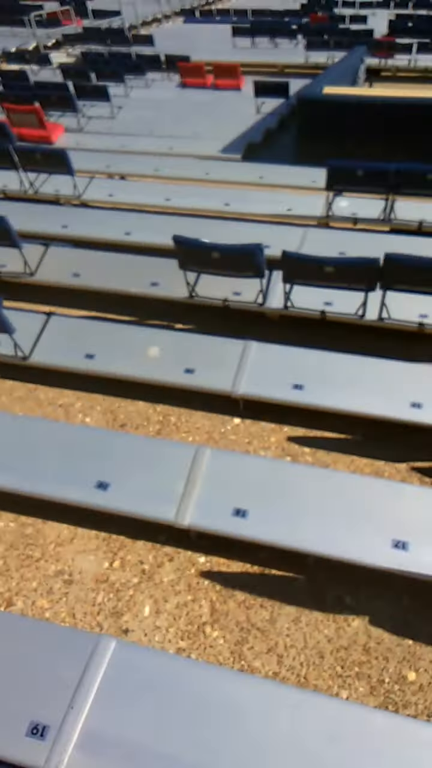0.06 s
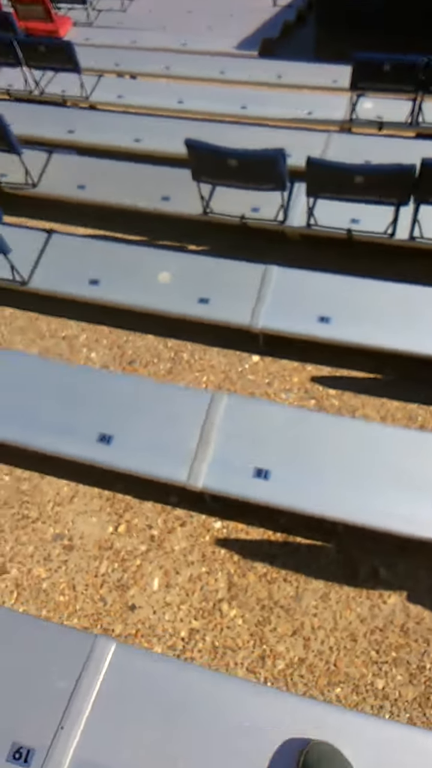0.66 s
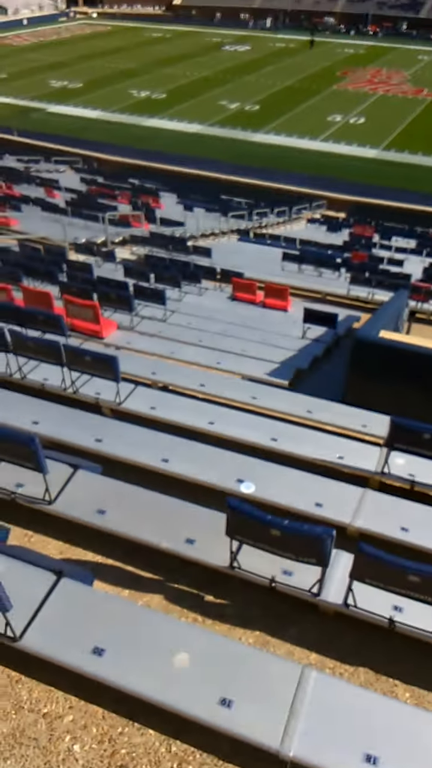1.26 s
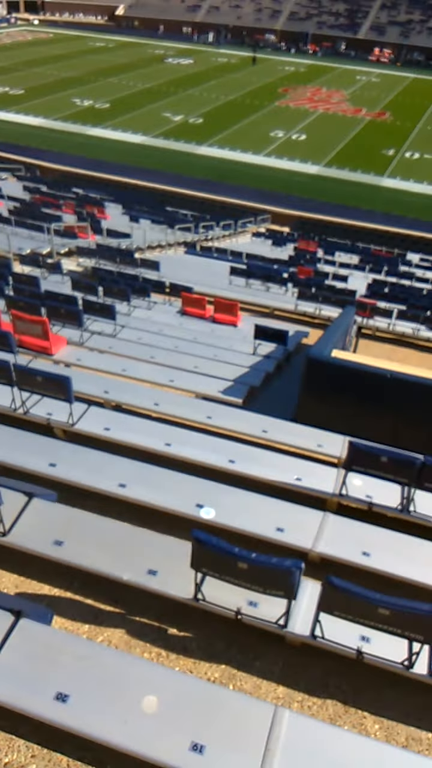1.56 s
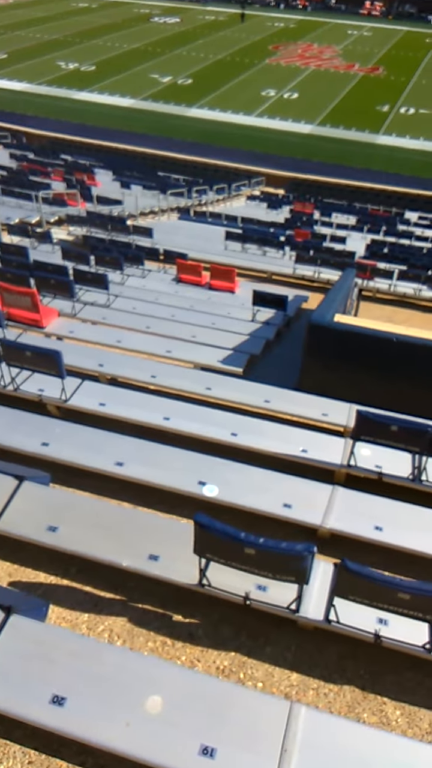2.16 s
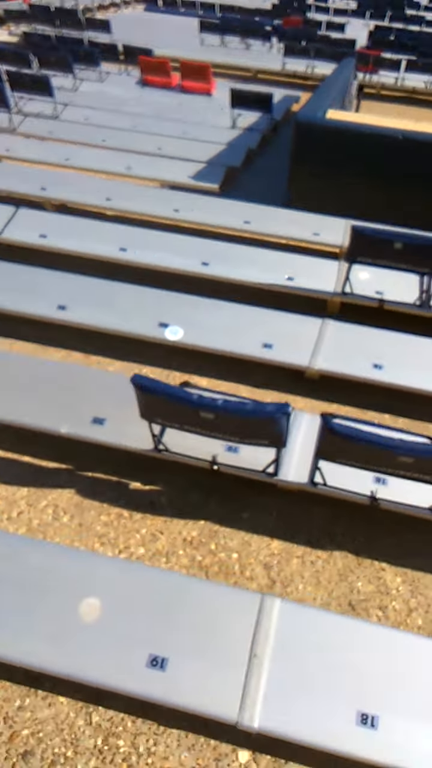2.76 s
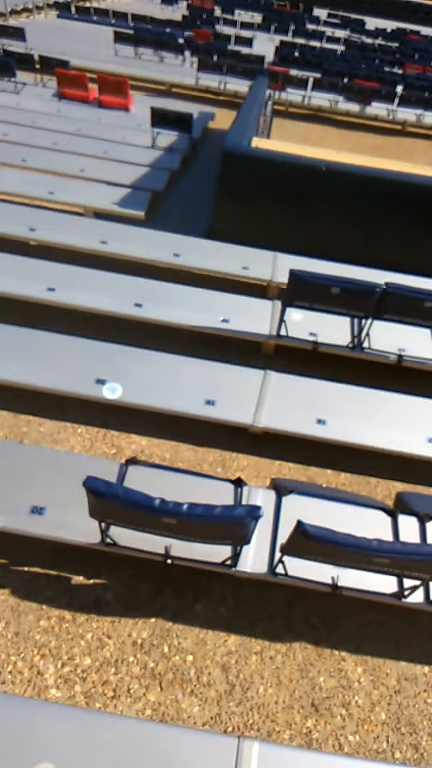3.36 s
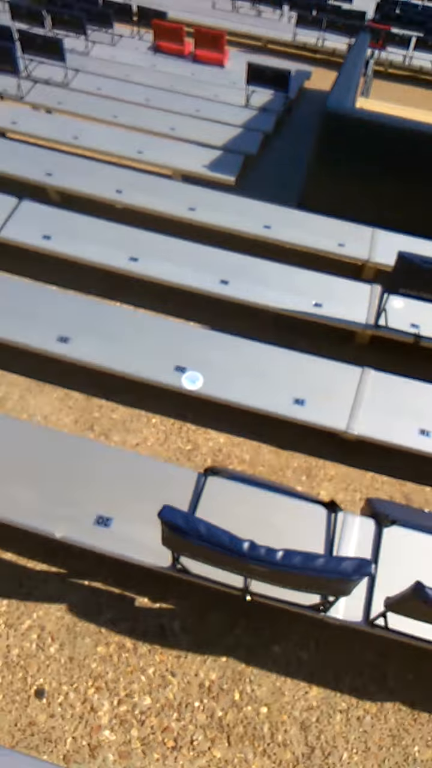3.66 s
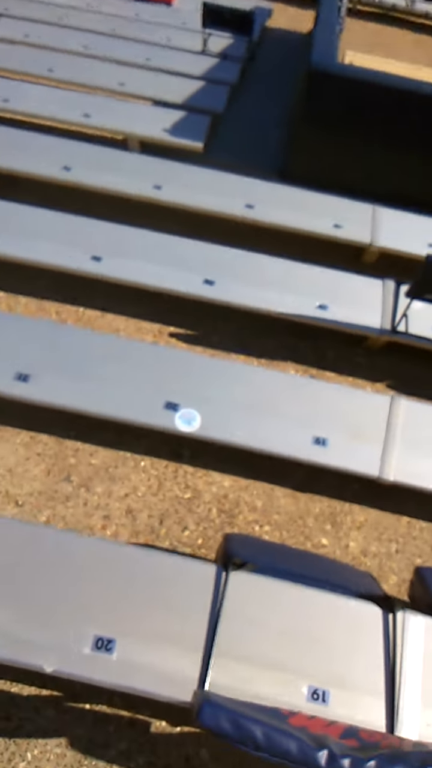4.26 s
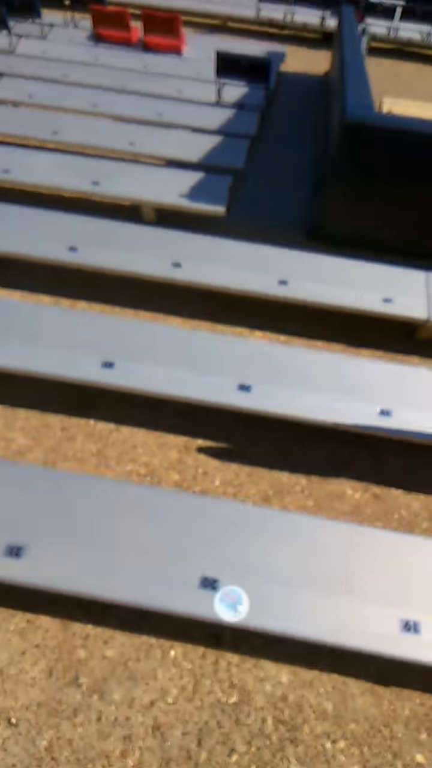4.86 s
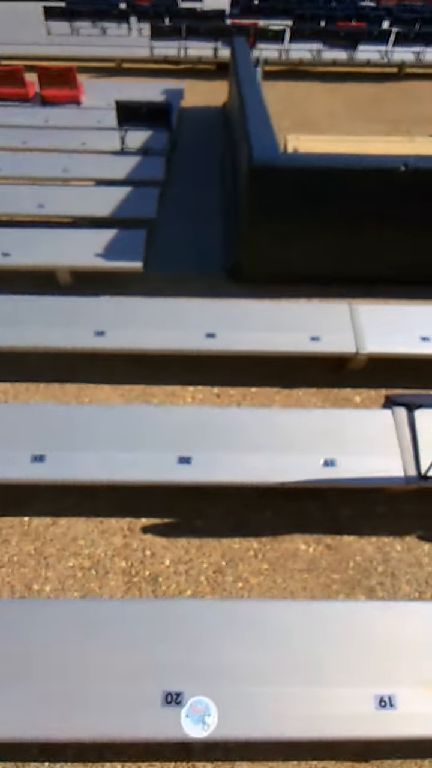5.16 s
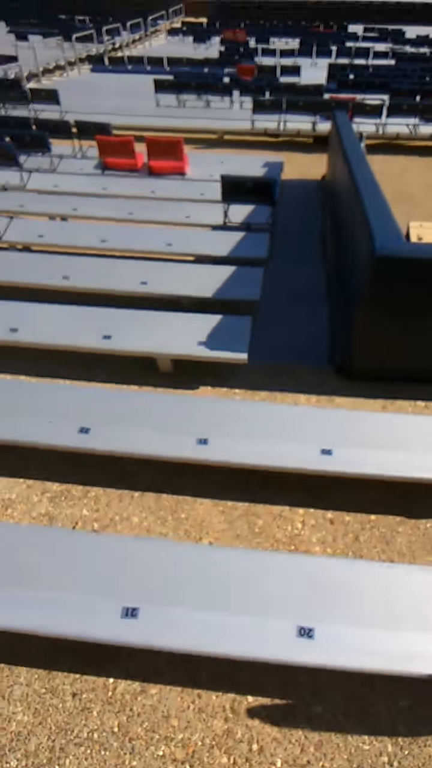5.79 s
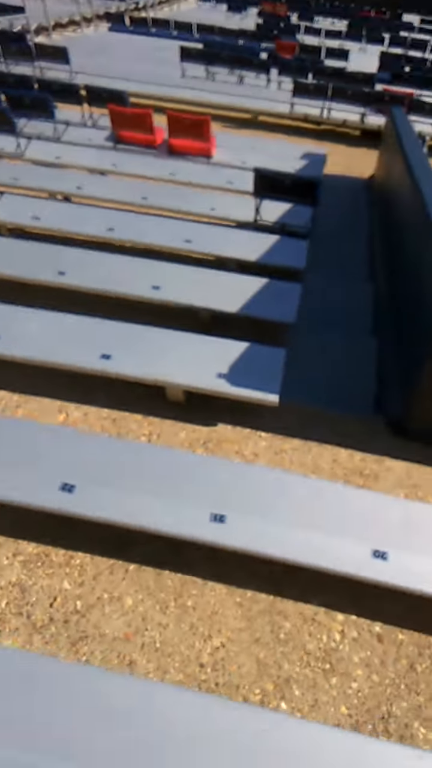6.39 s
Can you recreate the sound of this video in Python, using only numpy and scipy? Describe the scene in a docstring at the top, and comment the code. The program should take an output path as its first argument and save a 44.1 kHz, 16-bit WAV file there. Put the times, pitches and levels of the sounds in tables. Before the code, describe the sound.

Someone steps down hollow aluminium benches in an empty stadium, each step knocking and ringing, with gritty scrapes and a breeze.

```python
"""Empty open-air stadium: someone steps down rows of hollow aluminium benches, phone in hand.
Each footfall booms in a plank and rattles it on its brackets. Gritty soles scrape and tick on the
metal; the seats return a dull echo. Clothes rustle, wind bumps the microphone, town and machinery
hum far off. Now and then a faint squeak."""
import sys
import numpy as np
from scipy import signal
from scipy.fft import rfft, irfft, next_fast_len
from scipy.io import wavfile
from scipy.ndimage import uniform_filter1d

SR = 44100
rng = np.random.default_rng(int(sys.argv[2]) if len(sys.argv) > 2 else 0)


def persist_wave(psi):
    """Save psi, clipped to +-1, as 16-bit WAV."""
    counts = np.round(np.clip(psi, -1, 1) * 32767).astype(np.int16)
    wavfile.write(sys.argv[1], SR, np.atleast_2d(counts).T)


N = 292603
T = np.arange(N) / SR
RING_SAMPLES = SR
PORTS_APART_HZ = 1535  # plank sound decorrelates between the two mic ports above this

# Foot impacts: t/s, level/dB, contact cut-off/Hz, struck mode f/Hz, its boost/dB, its T60/s, rattle/dB
FOOT_IMPACTS = [ (0.787, -23, 1400, 1060, 4.5, 0.23, 1), (0.794, -25, 1270, 540, 16.5, .5, -4.5),
                (0.811, -34, 1300, 322, -1, .26, -9), (1.222, -34, 774, 202, 25, 0.4, 2.5),
                (1.238, -38.5, 585, 413.7, 27, 0.4, -7), (2.577, -26.5, 1380, 381.5, 17, 0.1, -2.5),
                (2.590, -32, 1110, 291, 7, .25, -12), (3.786, -21, 705, 291, 23, 0.15, -11),
                (4.811, -22.5, 1390, 394, 9, .15, -8), (4.840, -19, 1720, 1020, 4.5, 0.13, 1.5),
                (5.932, -28, 950, 425, 19, 0.66, 8.5), (5.957, -27.5, 800, 390, 17, 0.38, -4),
                (6.027, -21.5, 1000, 291, 9, 0.42, -4), (6.211, -31, 1000, 695, -2, .3, -12),
                (6.250, -33.5, 1010, 890, 15, .35, 2), (6.345, -34, 930, 295, 10, 1, -5)]
# A heavier foot damps more: impact level/dB, ring time factor
RING_SCALE = [(-39, 1.32), (-18.5, 0.75)]
# Plank bending modes: f/Hz, level/dB, base T60/s
BENDING_MODES = [(200, -11, 0.91), (294.7, -7, 0.53), (322.7, 6, 0.11), (367, -0.5, 0.49), (396, 4, 0.22),
                 (428.7, -1.5, 0.28), (483, 7.5, 0.13), (535.7, -2, 0.313), (560, -9, 0.1),
                 (600.8, 7, 0.24), (676, -3, 0.17), (830.6, 6.5, 0.14), (880, -11, 0.28), (923, 1.5, 0.36),
                 (1008.7, 10, 0.067), (1320, -19.5, 0.2)]
# Envelope of the dense, weaker plank modes: f/Hz, level/dB
BODY_SPECTRUM = [(60, -57), (120, -11), (200, 2.5), (300, 1.5), (500, 1), (700, -1), (1000, -4.5),
                 (1300, -10), (1700, -15), (2600, -11.5), (5000, -16), (14000, -42)]
# Sole scrapes: peak t/s, level/dB, rise/s, fall/s, coupling to plank/dB
SOLE_SCRAPES = [ (0.788, -24, 0.0016, 0.0084, -28), (0.808, -26, 0.008, 0.035, -23),
                (0.844, -36.5, .0035, .045, 6), (1.174, -40.5, 0.0099, 0.052, -25),
                (2.58, -30, .0006, 0.013, 3), (2.660, -37, 0.042, 0.057, 4),
                (3.733, -39.5, 0.0039, 0.024, -23.5), (3.806, -27, 0.0084, 0.019, -5),
                (3.866, -32, 0.0067, 0.019, -7), (4.176, -44.5, 0.0056, .025, 0),
                (4.288, -34.5, 0.0041, 0.023, -6), (4.824, -14.5, 0.0023, .014, 1),
                (4.842, -5.5, 0.0052, 0.014, -10), (4.852, -8, .0085, 0.028, -11),
                (4.882, -13, 0.0063, 0.011, -16.5), (4.954, -32, .0036, 0.006, -11),
                (5.074, -32.5, 0.0082, 0.032, -21), (5.126, -33.5, .0024, 0.014, -21),
                (5.285, -42.5, 0.023, 0.013, -5.5), (5.628, -34, 0.0029, 0.024, -16),
                (5.692, -30, 0.014, 0.01, -30), (5.934, -25, 0.0063, 0.022, 4),
                (6.029, -19.5, 0.033, .023, -1), (6.220, -37, 0.025, 0.039, 11)]
# Light brushes hiss, heavy scrapes are fuller: scrape level/dB, tilt/(dB/octave)
RASP_TILT = [(-46, 8.5), (-23, 0), (-22, -5), (-6, -0.5)]
# Grit on metal: f/Hz, level/dB
GRIT_SPECTRUM = [(200, -2), (1000, -3), (1700, -12.5), (2600, -10), (4000, -7.5), (6500, -5.5), (8500, 1.5),
                 (10500, 2.5), (12500, 3), (14500, -11.5)]
# Modes of the plank's thin walls: f/Hz, level/dB
THIN_WALL_MODES = [(1771, -5), (2396, -25), (2900, 5), (3528, -14), (4007, 9), (4436, 5.5), (5632, 9),
                   (6610, 8), (7726, -20), (10521, -10)]
# Grains snapping underfoot: t/s, level/dB, low edge/Hz, high edge/Hz
GRAIN_SNAPS = [(0.189, -42.5, 8000, 14000), (2.5769, -17.5, 5950, 7200), (3.7873, -28, 4000, 13000),
               (3.8645, -22.5, 8500, 14000), (4.8121, -16, 3260, 10000), (5.07, -26, 5500, 13800),
               (5.5743, -30, 8000, 14000), (5.589, -26, 8200, 14000), (5.6228, -19, 8700, 14100),
               (5.6636, -26.5, 7000, 14000), (5.7, -17.5, 2140, 14100), (5.7528, -23, 9000, 14000),
               (5.9118, -18.5, 7200, 14100), (5.931, -20, 6000, 14000), (6.027, -12, 9000, 14000),
               (6.1023, -27, 5940, 14000)]
# Crack of one grain: f/Hz, level/dB
SNAP_SPECTRUM = [(1500, -8), (2200, 17), (4000, -6.5), (6500, -6), (9000, 3.5), (11500, 10), (14500, -4)]
# Broad cracks die sooner: low edge/Hz, decay/s
SNAP_DECAY = [(2100, 0.0023), (8500, 0.0041)]
# Echo off the seats: f/Hz, level/dB
ECHO_SPECTRUM = [(100, -24), (400, -12), (1000, -8.0), (3000, -10), (12000, -21.5)]
# Fabric rub per leg swing: peak t/s, level/dB, rise and fall/s
LEG_SWINGS = [(0.33, -46.5, 0.1), (0.88, -57.5, 0.32), (1.45, -65.5, 0.38), (2.20, -58.5, 0.16),
              (3.03, -59, 0.099), (3.62, -64, 0.067), (4.15, -59, 0.62), (5.03, -46, 0.05),
              (5.30, -51.5, 0.061), (5.57, -48, 0.2), (6.28, -51, 0.51)]
# Fabric rustle: f/Hz, level/dB
CLOTH_SPECTRUM = [(2000, -65), (5000, -14), (7000, -3.5), (8800, 2), (10600, 6), (11600, 7.5),
                  (12600, -4.5), (14000, -1.5)]
# Breeze strength: t/s, level/dB
BREEZE_LEVEL = [(0.0, -37), (1.88, -64.5), (2.44, -53), (3.1, -63), (3.95, -46.5), (6.63, -51.5)]
# Wind rumble: f/Hz, level/dB
RUMBLE_SPECTRUM = [(20, -40), (35, -17), (55, 9.5), (72, -3.5), (120, -0.5), (170, -15), (300, -24.5),
                   (600, -75)]
# Eddies hitting the mic: t/s, level/dB, Gaussian half-width/s, cut-off/Hz
WIND_BUMPS = [(0.162, -18, 0.016, 147), (0.217, -20, 0.015, 120), (0.615, -28, 0.055, 156),
              (1.026, -22.5, 0.018, 137), (2.525, -34, 0.08, 94), (3.901, -26, 0.0076, 110),
              (5.477, -27.5, 0.021, 81)]
# One eddy: f/Hz, level/dB
EDDY_SPECTRUM = [(25, -24), (60, 6.5), (150, 1.5), (500, 0.0)]
# Distant town noise: f/Hz, level/dB
TOWN_SPECTRUM = [(100, 4.5), (300, 0), (550, -5), (900, -11.5), (1400, -17.5), (2000, -18.5), (3200, -26.5),
                 (5000, -33.5), (10500, -26), (14000, -41)]
# Town loudness: t/s, level/dB
TOWN_ENVELOPE = [(0.0, -58.5), (2.04, -54.5), (4.61, -60), (5.04, -58.5), (5.55, -59)]
# Low machinery drone: t/s, level/dB
DRONE_LEVEL = [(0.0, -41.5), (2.08, -50), (4.03, -42), (5.63, -41), (6.63, -45.5)]
# Thinner machinery hum: t/s, level/dB
HUM_LEVEL = [(0.0, -55.5), (1.26, -45), (4.6, -65), (4.9, -54), (5.8, -64)]
# Faint squeaks: centre t/s, level/dB, start f/Hz, end f/Hz, length/s
SQUEAKS = [(2.715, -58, 4400, 4500, .06), (2.955, -63, 4550, 4750, .04), (3.076, -54, 5700, 5500, .035),
           (6.220, -47, 4850, 4750, .06)]


def footfalls(rattle_per_s=500, rattle_decay_s=0.022):
    """The heel bends the plank, which then chatters briefly on its brackets."""
    out, t = np.zeros((2, N)), np.arange(RING_SAMPLES // 8) / SR
    for at_s, db, contact_hz, spot_hz, boost_db, spot_t60_s, rattle_db in FOOT_IMPACTS:
        ring_scale = lookup(RING_SCALE, db)
        hits = rng.random(len(t)) < rattle_per_s / SR
        chatter = hits * rng.standard_normal(len(t)) * np.exp(-t / rattle_decay_s)
        force = amp(rattle_db) * chatter / np.linalg.norm(chatter)
        force[0] += 1  # heel impulse
        boom = signal.fftconvolve(plank_boom(contact_hz, ring_scale), force[None], axes=1)
        add(out, at_s, amp(db) * boom)
        add(out, at_s, amp(db) * plank_bending(contact_hz, ring_scale, spot_hz, boost_db, spot_t60_s))
    return out


def plank_boom(contact_hz, ring_scale, low_hz=70, body_db=-3.5, clank_db=-19):
    """Dense modes: hollow boom plus short clank. Softer contact is duller; a resting foot damps both."""
    t = np.arange(RING_SAMPLES) / SR
    body = colour(port_noise(len(t), PORTS_APART_HZ), BODY_SPECTRUM, low_hz, high_hz=1.1 * contact_hz)
    clank = colour(port_noise(len(t), PORTS_APART_HZ), BODY_SPECTRUM, low_hz=1310, high_hz=2860)
    body *= decay(t, t60_s=0.38 * ring_scale)
    clank *= decay(t, t60_s=0.15 * ring_scale)
    return amp(body_db) * body + amp(clank_db) * clank


def plank_bending(contact_hz, ring_scale, spot_hz, boost_db, spot_t60_s, gain_db=-10.5):
    """Pitched ring; the mode that swings most at the struck spot gets its own gain and decay."""
    t, out = np.arange(2 * RING_SAMPLES) / SR, 0
    for hz, db, base_t60_s in BENDING_MODES:
        detune, polarity = rng.standard_normal(2)
        at_spot = np.exp(-(np.log(hz / spot_hz) / .05) ** 4)
        gain = np.sign(polarity) * amp(db + at_spot * boost_db) / np.hypot(1, (hz / contact_hz) ** 2)
        t60_s = at_spot * spot_t60_s + (1 - at_spot) * ring_scale * base_t60_s
        out += gain * np.sin(2 * np.pi * hz * (1 + 0.0045 * detune) * t) * decay(t, t60_s)
    return amp(gain_db) * out


def scrapes(judder_db=1.0, lead_s=.1):
    """Grit rolls under the sliding sole: a bright, juddering rasp that also rings the plank."""
    out, t = np.zeros((2, N)), np.arange(RING_SAMPLES // 2) / SR - lead_s
    for peak_s, db, rise_s, fall_s, plank_db in SOLE_SCRAPES:
        pressure = np.exp(-np.where(t < 0, -t / rise_s, t / fall_s))
        pressure *= amp(judder_db * wander(rate_hz=300, size=len(t)))
        grit = grains(len(t))
        rasp = pressure * colour(grit, GRIT_SPECTRUM, tilt_db_per_oct=lookup(RASP_TILT, db))
        add(out, peak_s - lead_s, amp(db) * signal.fftconvolve(rasp, wall_ring(), axes=1))
        force = pressure * grit[:1]
        plank = plank_boom(contact_hz=2300, ring_scale=0.63, low_hz=450)
        boom = signal.fftconvolve(plank, force / np.linalg.norm(force), axes=1)
        add(out, peak_s - lead_s, amp(db + plank_db) * boom)
    return out


def grains(size, rate_per_s=2500, spread_db=3):
    """Rolling grit: dense, uneven clicks over smooth hiss."""
    hits = rng.random(size) < rate_per_s / SR
    clicks = hits * rng.standard_normal(size)
    clicks *= amp(spread_db * np.minimum(rng.exponential(size=size), 3))
    return 0.42 * unit_rms(clicks) + .45 * rng.standard_normal((2, size))


def wall_ring(t60_s=.05, gain_db=-45):
    """Short, bright impulse response of thin aluminium, slightly different at each spot."""
    t, ring = np.arange(RING_SAMPLES // 8) / SR, 0
    for hz, db in THIN_WALL_MODES:
        louder, detune = rng.standard_normal(2)
        ring += amp(db + 2 * louder) * np.cos(2 * np.pi * hz * (1 + .025 * detune) * t)
    ring *= amp(gain_db) * decay(t, t60_s)
    ring[0] += 1  # direct path
    return ring[None]


def ticks(shimmer_db=-19, shimmer_decay_s=.014):
    """A grain snaps: sharp crack, faint longer shimmer."""
    out, t = np.zeros((2, N)), np.arange(RING_SAMPLES // 8) / SR
    shimmer = amp(shimmer_db) * np.exp(-t / shimmer_decay_s)
    for at_s, db, low_hz, high_hz in GRAIN_SNAPS:
        crack = colour(port_noise(len(t), apart_hz=4000), SNAP_SPECTRUM, low_hz, high_hz)
        envelope = np.exp(-t / lookup(SNAP_DECAY, low_hz)) + shimmer
        add(out, at_s, amp(db) * crack * envelope)
    return out


def seat_echo(x, t60_s=0.54, onset_s=0.038, wet_db=-24.0):
    """Rows of seats scatter back a thin, dull echo."""
    t = np.arange(RING_SAMPLES) / SR
    tail = colour(port_noise(len(t), apart_hz=970), ECHO_SPECTRUM)
    tail *= decay(t, t60_s) * np.minimum(t / onset_s, 1)
    return amp(wet_db) * signal.fftconvolve(x, tail / np.linalg.norm(tail[0]), axes=1)[:, :N]


def clothes(rest_db=-67.5, bright_db=3, flutter_db=1.5):
    """Fabric rubs with each leg swing; a firmer rub is brighter."""
    rub = amp(rest_db)
    for peak_s, db, fade_s in LEG_SWINGS:
        rub += amp(db) * np.exp(-np.abs((T - peak_s) / fade_s) ** 1.65)
    soft = colour(port_noise(N, apart_hz=3500), CLOTH_SPECTRUM)
    bright = colour(port_noise(N, apart_hz=5000), GRIT_SPECTRUM, low_hz=10900)
    bright *= amp(bright_db) * (rub / rub.max()) ** 0.88
    return (soft + bright) * rub * amp(flutter_db * wander(rate_hz=60))


def wind(rumble_db=3, gust_db=1.5):
    """Air on the mic: restless rumble, different per port, and soft bumps mostly on the right."""
    gusts = amp(lookup(BREEZE_LEVEL, T) + rumble_db + gust_db * wander(rate_hz=20))
    rumble = gusts * colour(port_noise(N, apart_hz=25), RUMBLE_SPECTRUM)
    bumps, t = np.zeros((2, N)), np.arange(RING_SAMPLES // 2) / SR
    for peak_s, db, width_s, high_hz in WIND_BUMPS:
        start_s = max(peak_s - t.mean(), 0)
        eddy = colour(port_noise(len(t), apart_hz=71), EDDY_SPECTRUM, high_hz=high_hz)
        swell = np.exp(-((start_s + t - peak_s) / width_s) ** 2 / 2)
        add(bumps, start_s, amp(db) * unit_rms(eddy * swell) * np.sqrt(np.mean(swell ** 2)))
    return pan(rumble, left_db=-2) + pan(bumps, left_db=-9)


def town(gain_db=11, drift_db=1.6):
    """Distant town: dull noise, drifting in level."""
    noise = colour(port_noise(N, apart_hz=1160), TOWN_SPECTRUM)
    return noise * amp(lookup(TOWN_ENVELOPE, T) + gain_db + drift_db * wander(rate_hz=8.1))


def machinery(drone_db=2, hum_db=1):
    """Far machinery: throbbing low drone, thinner hum."""
    drone = distant_tone(hz=89.4, depth=1.8, rate_hz=40) * amp(lookup(DRONE_LEVEL, T) + drone_db)
    hum = distant_tone(hz=290, depth=0.16, rate_hz=15) * amp(lookup(HUM_LEVEL, T) + hum_db)
    return drone + hum


def distant_tone(hz, depth, rate_hz):
    """Tone whose level and phase wander on the way; rms 1."""
    path = 1 + depth * (wander(rate_hz) + 1j * wander(rate_hz))
    return unit_rms(np.real(path * np.exp(2j * np.pi * hz * T)))


def squeaks(quaver=.025):
    """Thin, quavering tones with a slight glide."""
    out = np.zeros((2, N))
    for centre_s, db, start_hz, end_hz, length_s in SQUEAKS:
        size = int(length_s * SR)
        hz = np.linspace(start_hz, end_hz, size) * (1 + quaver * wander(rate_hz=700, size=size))
        tone = np.sin(2 * np.pi * np.cumsum(hz) / SR)
        add(out, centre_s - length_s / 2, amp(db) * np.hanning(size) * tone)
    return out


def port_noise(size, apart_hz):
    """Noise at two mic ports: alike in the bass, unrelated above apart_hz."""
    mid, side = rng.standard_normal((2, size))
    highpass = signal.butter(1, min(apart_hz, SR / 4), "high", fs=SR, output="sos")
    side = signal.sosfilt(highpass, side)
    return np.array([mid + side, mid - side])


def colour(x, spectrum, low_hz=1, high_hz=1e6, tilt_db_per_oct=0):
    """Shape by (f/Hz, level/dB) points, steep band edges and a tilt above 1 kHz; rms 1."""
    size = next_fast_len(x.shape[-1])
    f = np.maximum(np.fft.rfftfreq(size, 1 / SR), 1)
    hz, db = np.transpose(spectrum)
    tilt_db = tilt_db_per_oct * np.log2(np.maximum(f, 1000) / 1000)
    gain = amp(np.interp(np.log(f), np.log(hz), db) + tilt_db)
    gain /= np.sqrt((1 + (low_hz / f) ** 8) * (1 + (f / high_hz) ** 6))
    return unit_rms(irfft(rfft(x, size) * gain, size)[..., :x.shape[-1]])


def wander(rate_hz, size=N):
    """Smooth random drift; rms 1."""
    hold = int(SR / rate_hz)
    steps = np.repeat(rng.standard_normal(size // hold + 1), hold)
    return unit_rms(uniform_filter1d(uniform_filter1d(steps, hold), hold)[:size])


def decay(t, t60_s):
    """Fall of 60 dB per t60_s."""
    return np.exp(-np.log(1000) * t / t60_s)


def amp(db):
    """dB to gain."""
    return 10 ** (np.asarray(db) / 20)


def unit_rms(x):
    """Scale to rms 1."""
    return x / np.sqrt(np.mean(x ** 2))


def lookup(points, at):
    """Interpolate (x, y) points linearly."""
    return np.interp(at, *np.transpose(points))


def add(out, at_s, x):
    """Mix x into out from at_s."""
    i = int(at_s * SR)
    out[:, i:i + x.shape[-1]] += x[..., :max(N - i, 0)]


def pan(x, left_db):
    """Set left port level relative to right."""
    return x * amp([[left_db / 2], [-left_db / 2]])


def scene(port_lag_s=.00022):
    """Full mix. The feet are nearer the left port: earlier and louder there."""
    left, right = footfalls() + scrapes() + ticks()
    feet = np.array([left, np.roll(right, int(port_lag_s * SR))])
    walker = pan(feet + seat_echo(feet) + clothes(), left_db=2)
    return walker + wind() + town() + machinery() + squeaks()


def record(dry, low_hz=40, high_hz=14300, right_treble_db=-6):
    """Phone: bass cut, duller right port, clipping at full scale, steep treble cut."""
    f = np.fft.rfftfreq(N, 1 / SR)
    left, right = signal.sosfilt(signal.butter(4, low_hz, "high", fs=SR, output="sos"), dry)
    right = irfft(rfft(right) * amp(np.interp(f, [8000, 12500], [0, right_treble_db])), N)
    clipped = np.clip([left, right], -1, 1)
    return signal.sosfilt(signal.ellip(10, .2, 70, high_hz, fs=SR, output="sos"), clipped)


dry = scene()
out = record(dry)
persist_wave(out)
```